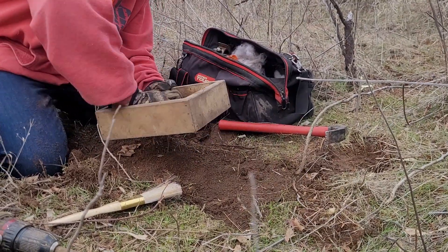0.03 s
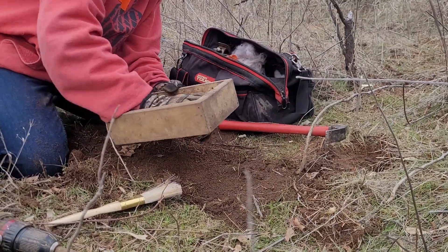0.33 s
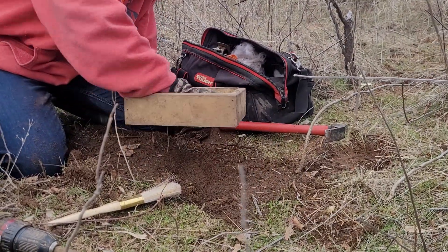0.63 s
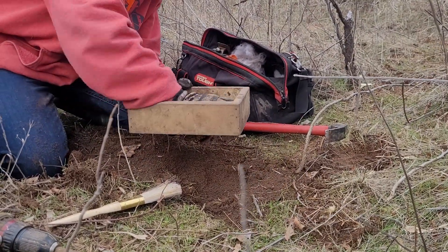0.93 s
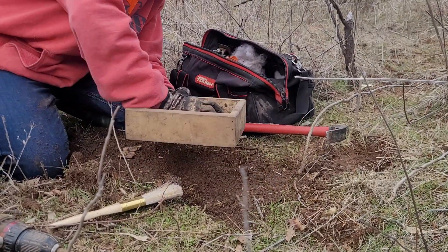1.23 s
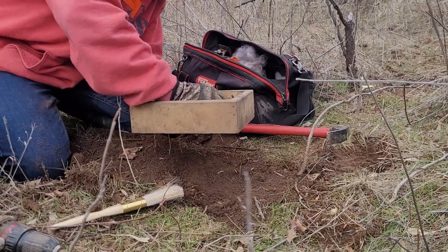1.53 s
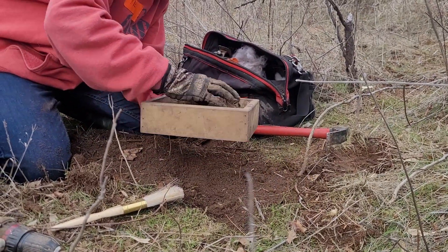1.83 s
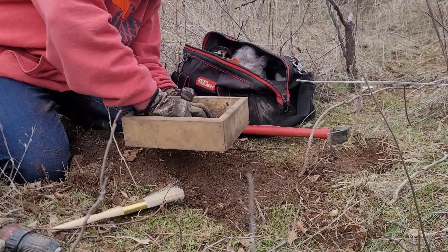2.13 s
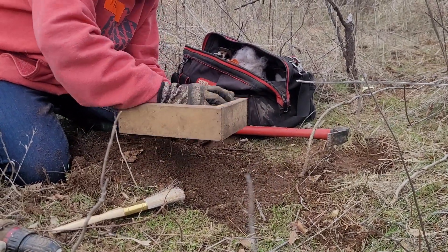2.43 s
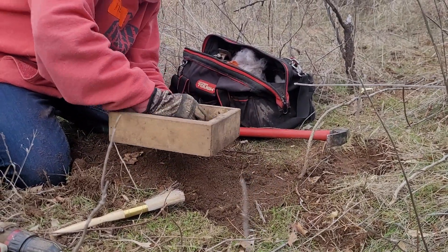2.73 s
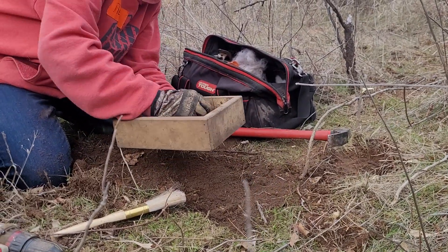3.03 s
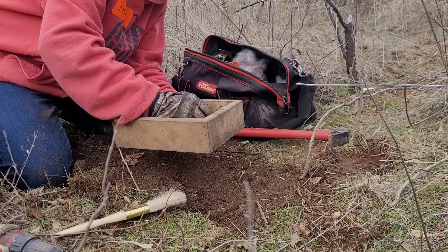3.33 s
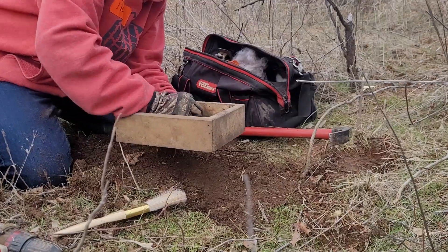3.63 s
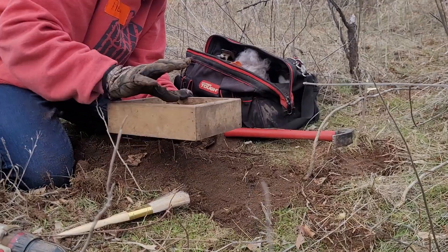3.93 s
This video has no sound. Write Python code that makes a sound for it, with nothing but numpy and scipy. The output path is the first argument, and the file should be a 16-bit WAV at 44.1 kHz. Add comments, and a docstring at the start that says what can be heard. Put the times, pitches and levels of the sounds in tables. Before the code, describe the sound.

Gritty scraping and swishing of dirt being hand-sifted in a wooden box sieve outdoors.

```python
"""First comes a gritty rubbing and a bright hiss: a gloved hand works soil through a wooden box sieve,
outdoors and a little to the left. Each stroke crushes crumbs against the mesh and lets fine soil through.
Light wind buffets the microphone over a faint low hum. Twigs snap, the frame is knocked,
grit scratches the wires and clods rattle in the box."""
import sys
import numpy as np
from scipy import signal
from scipy.fft import rfft, irfft
from scipy.io import wavfile
from scipy.ndimage import uniform_filter1d, map_coordinates

SR = 44100
rng = np.random.default_rng(int(sys.argv[2]) if len(sys.argv) > 2 else 0)


def int16_out(signal):
    """Quantize to a 16-bit WAV file."""
    q = np.round(np.clip(np.atleast_2d(signal).T, -1, 1) * 32767)
    wavfile.write(sys.argv[1], SR, q.astype(np.int16))


N = 176400
T = np.arange(N) / SR


def amp(db):
    """Turn decibels into a gain to multiply by."""
    return 10 ** (np.asarray(db) / 20)


def unit(x):
    """Scale a sound to an average (rms) level of 1."""
    return x / np.sqrt(np.mean(x ** 2) + 1e-30)


def even(response):
    """Scale a filter so that white noise keeps its power."""
    return response / np.sqrt(np.sum(response ** 2) + 1e-30)


def through(x, response):
    """Pass a sound through a filter, given as its response to one click."""
    return signal.fftconvolve(x, response)[:len(x)]


def tone(points, size=4096):
    """Make a filter's click response from (pitch [Hz], level [dB]) points."""
    hz, db = np.array(points, float).T
    log_hz = np.log(np.arange(size // 2 + 1) * SR / size + 1)
    cepstrum = irfft(np.interp(log_hz, np.log(hz), np.log(amp(db))))
    cepstrum[1:size // 2] *= 2  # fold it so that nothing sounds before the click
    cepstrum[size // 2 + 1:] = 0
    return irfft(np.exp(rfft(cepstrum)))


def lowpass(x, hz, order=2):
    """Soften everything above hz."""
    return signal.sosfilt(signal.butter(order, min(hz, SR / 3), fs=SR, output="sos"), x)


def wander(per_s):
    """A smooth random drift, about 1 in size."""
    hold = max(int(SR / per_s), 2)
    steps = np.repeat(rng.standard_normal(N)[:N // hold + 1], hold)
    return unit(uniform_filter1d(steps, hold)[:N])


def add(out, time, sound):
    """Mix a sound in at a time in seconds."""
    start = int(time * SR)
    out[start:start + len(sound)] += sound[:N - start]


def grains(per_s, spread_db):
    """Tiny impacts of uneven size at random moments."""
    hits = (rng.random(N) < per_s / SR) * np.sign(rng.standard_normal(N))
    return unit(hits * amp(spread_db * np.clip(rng.standard_normal(N), -2.5, 2.5)))


def rattle(decay, hits_per_s=2600, spread_db=0.5, size=4096):
    """A quick run of impacts that dies away."""
    hits = (rng.random(size) < hits_per_s / SR) * rng.choice([-1, 1], size)
    strength = amp(spread_db * rng.standard_normal(size))
    return even(hits * strength * np.exp(-T[:size] / decay)) * np.sqrt(decay * SR / 2)


def blow(sound, db):
    """Give a short sound the energy of 4 ms at this level."""
    return even(sound) * amp(db) * np.sqrt(.004 * SR)


def ring(notes, detune=0, size=4096):
    """A struck object's fading notes, each off its pitch by a random share."""
    t = T[:size]
    tuning = 1 + detune * rng.standard_normal(len(notes))
    return even(sum(amp(db - 60 * t / fade) * np.sin(2 * np.pi * hz * k * t)
                    for (hz, fade, db), k in zip(notes, tuning)))


# notes of the loaded box (pitch [Hz], time to fade by 60 dB [s], level [dB])
BOX_NOTES = [(280, 0.011, 6.5), (725.5, 0.039, 2.5), (990, 0.013, 6), (1585, 0.04, 5.5), (1827, 0.04, 8),
             (2480, 0.021, 12.5), (3660, 0.025, 6.5), (4246, 0.031, 0.5)]
def box_ring(detune=0.036):
    """The wooden box rings; the hand and the shifting load put it slightly out of tune each time."""
    return ring(BOX_NOTES, detune)


# tone of the box's hollow (pitch [Hz], level [dB])
HOLLOW_TONE = [(280, -6.5), (450, -7.5), (700, -2.5), (1200, -1), (1550, -0.5), (2480, -1), (4400, -1.5),
               (5850, -3.5), (7450, 3.5), (8600, -1), (10500, 1)]
def hollow(x):
    """The box colours the sound of soil moving in it."""
    return through(x, tone(HOLLOW_TONE))


def coarse_crumbs(per_s=330, low_hz=1497, high_hz=4410, decay_cycles=7.1, spread_db=3.5):
    """Big crumbs crack one by one, each a few cycles at a random pitch."""
    out = np.zeros(N)
    for when, pitch, chance in rng.random((int(per_s * N / SR), 3)):
        hz = low_hz * (high_hz / low_hz) ** pitch
        cycles = hz * T[:512]
        strength = amp(spread_db * min(-np.log(chance), 3))
        add(out, when * T[-1], strength * np.exp(-cycles / decay_cycles) * np.sin(2 * np.pi * cycles))
    return unit(out)


def glove_roll(x, band_range_hz=(1136, 5240), bands=9, swing_db=3.5):
    """As the glove rolls over the crumbs, each band of pitch swells and fades on its own."""
    spectrum = rfft(x)
    log_hz = np.log(np.arange(len(spectrum)) * SR / N + 1)
    centres = np.linspace(*np.log(band_range_hz), bands)
    parts = [irfft(spectrum * np.interp(log_hz, centres, band), N) for band in np.eye(bands)]
    return unit(sum(part * amp(swing_db * wander(per_s=36)) for part in parts))


CRUMBS_PER_S, CRUMB_SPREAD_DB, FINES_PER_S, FINE_SPREAD_DB = 4500, 3, 15000, 2.5
# tones of crushed crumbs and of fine soil (pitch [Hz], level [dB])
CRUNCH_TONE = [(120, -25), (270, 4.5), (450, -15.5), (690, -19), (900, -11.5), (1300, -6.5), (1560, 0),
               (2080, -4.5), (2400, 3.5), (2950, -1.5), (4400, 2), (5600, -12), (8000, -21), (15000, -39)]
HISS_TONE = [(1000, -9.5), (4000, -2.5), (5800, -5.5), (7500, -2), (8600, -4), (10000, 0), (12500, -1.5),
             (15500, -6.5)]
# hand strokes (peak time [s], rise [s], fall [s], crunch level [dB], hiss level [dB], rasp pitch [Hz])
HAND_STROKES = [(.03, 0.09, 0.072, -54.5, -57, 2560), (.10, 0.031, 0.035, -43.5, -53, 2430),
                (0.2, 0.047, 0.015, -50, -61, 2540), (.325, 0.14, 0.036, -54.5, -66, 2590),
                (0.426, 0.067, 0.037, -45, -52.5, 2420), (0.568, 0.044, 0.067, -45, -51.5, 2720),
                (0.717, 0.039, 0.02, -47, -52.5, 3170), (0.836, 0.065, 0.017, -53.5, -61, 2800),
                (0.853, 0.014, 0.042, -45.5, -55.5, 2280), (0.983, 0.039, 0.018, -43.5, -48, 3370),
                (1.09, 0.05, 0.027, -48, -56.5, 2850), (1.204, 0.036, 0.015, -43, -49, 3640),
                (1.26, 0.023, 0.017, -50, -56.5, 1720), (1.299, 0.018, 0.026, -43.5, -57, 2280),
                (1.396, 0.032, 0.016, -43.5, -49.5, 2570), (1.479, 0.046, 0.046, -51.5, -60, 2400),
                (1.765, 0.058, 0.042, -68, -75.5, 2530), (2.006, 0.0084, 0.02, -51, -56.5, 1860),
                (2.099, 0.024, 0.018, -51, -55.5, 1960), (2.16, 0.026, 0.055, -66, -74, 2800),
                (2.293, .035, 0.034, -49.5, -58, 2000), (2.436, 0.031, 0.0099, -57, -67.5, 2840),
                (2.565, 0.061, 0.04, -62, -62, 3700), (2.609, 0.022, 0.047, -55, -68, 2470),
                (2.749, 0.041, 0.036, -63.5, -67.5, 2270), (2.954, 0.052, 0.024, -63.5, -63, 2030),
                (3.02, 0.12, 0.026, -57, -74.5, 1730), (3.162, 0.069, 0.03, -53, -59, 2180),
                (3.281, 0.039, 0.063, -52, -58, 2080), (3.409, 0.022, 0.046, -59.5, -60.5, 4050),
                (3.466, 0.02, 0.019, -52, -63, 2340), (3.577, 0.049, 0.048, -51.5, -55, 2870),
                (3.693, 0.036, 0.05, -51.5, -55, 3700), (3.815, 0.029, 0.046, -50, -54.5, 3960),
                (3.891, 0.021, 0.032, -53.5, -57.5, 2650)]
def rubbing(rasp_db=5, rasp_octaves=0.63, box_db=-8.5):
    """Each stroke swells and fades: crumbs rasp on the mesh and ring the box, fine soil hisses through."""
    catch = wander(per_s=220)  # the glove catches and slips
    crumbs = amp(1.38 * catch) * grains(CRUMBS_PER_S, CRUMB_SPREAD_DB)
    crumbs = glove_roll(through(crumbs, even(tone(CRUNCH_TONE))) + amp(-6) * coarse_crumbs())
    fines = through(amp(2 * catch) * grains(FINES_PER_S, FINE_SPREAD_DB), even(tone(HISS_TONE)))
    taps = grains(CRUMBS_PER_S, CRUMB_SPREAD_DB)
    out = amp(-74) * crumbs + amp(-80.5) * fines  # a trickle goes on between strokes
    width = 2 ** rasp_octaves
    for peak, rise, fall, crunch_db, hiss_db, hz in HAND_STROKES:
        span = slice(max(int((peak - 3 * rise) * SR), 0), int((peak + 3 * fall) * SR))
        t = T[span] - peak
        push = np.exp(-np.abs(t / np.where(t < 0, rise, fall)) ** 2.05)  # a lopsided bell curve
        grip = tone([(hz / width, -rasp_db), (hz, 0), (hz * width, -rasp_db)], size=1024)
        rasp = unit(through(crumbs[span], grip))
        box = amp(box_db) * through(taps[span], box_ring())
        out[span] += push * (amp(crunch_db) * (rasp + box) + amp(hiss_db) * fines[span])
    return hollow(out)


# tone of pouring soil (pitch [Hz], level [dB])
POUR_TONE = [(4000, -15), (6000, -16), (8000, -13), (10500, -13), (14500, -5)]
# runs of fine soil (start [s], end [s], level [dB])
POUR_RUNS = [(0, .45, -58), (2.09, 2.104, -53.5)]
def pouring(fade_s=0.015):
    """Fine soil falls through the mesh in bright runs of tiny impacts."""
    flow = sum(amp(db) * np.clip(1 + np.minimum(T - start, end - T) / fade_s, 0, 1)
               for start, end, db in POUR_RUNS)
    return flow * through(grains(FINES_PER_S, FINE_SPREAD_DB), even(tone(POUR_TONE)))


# gusts of wind (peak time [s], half length [s], level [dB], top pitch [Hz])
WIND_GUSTS = [(0.036, 0.026, -46.5, 96), (.19, 0.11, -46.5, 81), (0.332, 0.012, -40, 118),
              (0.5, 0.15, -50.5, 85), (0.673, 0.014, -29.5, 82), (0.799, 0.046, -40, 95),
              (0.969, 0.021, -35.5, 105), (1.011, 0.011, -37, 70), (1.062, 0.015, -32, 133),
              (1.489, 0.02, -48.5, 74.4), (1.666, 0.028, -35.5, 93), (1.739, 0.031, -32, 63),
              (1.933, 0.18, -45, 76.6), (2.222, 0.054, -46.5, 79), (2.514, 0.15, -52, 77.4),
              (2.73, 0.032, -44.5, 72), (2.828, 0.015, -34, 74.6), (2.954, 0.011, -40, 106),
              (3.051, 0.079, -42.5, 71.4)]
def wind(breeze_db=-55.5, breeze_ends_s=3.2, lowest_hz=35, left_db=-19.5, shared=0.24):
    """Swirls of air rumble and thump on the microphone, mostly on the right."""
    low_cut = signal.butter(3, lowest_hz, "high", fs=SR, output="sos")
    left, right = signal.sosfilt(low_cut, rng.standard_normal((2, N)))
    noise = np.array([shared * right + np.sqrt(1 - shared ** 2) * left, right])
    fade_out = np.clip((breeze_ends_s - T) / 0.029, 0, 1)
    out = amp(breeze_db) * unit(lowpass(noise, hz=43.3, order=3)) * fade_out
    for peak, half, db, hz in WIND_GUSTS:
        swell = np.exp(-((T - peak) / half) ** 2)
        out += amp(db) * unit(lowpass(noise, hz, order=4) * swell) * np.sqrt(np.mean(swell ** 2))
    return signal.sosfilt(low_cut, out) * amp([[left_db], [0]])


# tone of still air (pitch [Hz], level [dB])
AIR_TONE = [(25, -6.5), (60, 12), (130, -3.5), (260, -8), (450, -20.5), (1000, -27.5), (4000, -33),
            (15000, -32)]
def air_and_hum(air_db=-66, hum_hz=64, hum_db=-62, hum_left_db=-9.5):
    """Quiet outdoor air and a low, slightly wavering hum."""
    noise = rng.standard_normal((2, N)) + 0.67 * rng.standard_normal(N)  # partly shared by both sides
    air = np.array([unit(through(side, tone(AIR_TONE))) for side in noise])
    pitch = hum_hz * (1 + .015 * wander(per_s=6))
    hum = unit(np.sin(2 * np.pi * np.cumsum(pitch) / SR) * amp(1.8 * wander(per_s=7)))
    return amp(air_db) * air + amp(hum_db) * hum * amp([[hum_left_db], [0]])


# tone of one snap (multiple of its strongest pitch [ratio], level [dB])
SNAP_TONE = [(.03, -26), (.12, -4.5), (.4, -6), (1, 1.5), (1.6, -2), (2.6, -19.5), (6, -26)]
# snapping twigs and small stones (time [s], level [dB], strongest pitch [Hz])
TWIG_SNAPS = [(0.1183, -31, 1900), (0.4034, -46.5, 2870), (0.484, -39, 1460), (.493, -48, 2230),
              (0.8468, -42.5, 2350), (1.0988, -41, 1930), (1.2154, -49, 1900), (2.1949, -54.5, 8900),
              (2.5396, -31.5, 2350)]
def snaps():
    """Twigs and small stones give single dry cracks that do not ring."""
    out = np.zeros(N)
    for time, db, hz in TWIG_SNAPS:
        crack = tone([(hz * multiple, level) for multiple, level in SNAP_TONE])
        add(out, time, blow(crack, db))
    return out


# knocks on the frame (time [s], level [dB], top pitch [Hz], fade time under the grip [s])
FRAME_KNOCKS = [(0.1733, -47.5, 1500, .002), (0.7255, -36, 950, 0.0061), (0.848, -48, 920, 0.034),
                (1.100, -42, 900, 0.033), (1.213, -45.5, 900, .03), (1.294, -45.5, 910, 0.033),
                (2.068, -59.5, 1000, .04), (2.155, -60, 950, .04), (2.196, -58.5, 1000, .04),
                (2.225, -60, 850, .04), (2.243, -58, 950, .04), (2.74, -60.5, 2400, .004),
                (3.758, -57.5, 1540, .003)]
def knocks(lowest_hz=534):
    """Soft blows make a hollow tock, cut short by the hand's grip; the small frame gives little bass."""
    out = np.zeros(N)
    low_cut = signal.butter(4, lowest_hz, "high", fs=SR, output="sos")
    for time, db, hz, fade in FRAME_KNOCKS:
        wood = box_ring(detune=0.018)
        tock = signal.sosfilt(low_cut, wood * np.exp(-T[:len(wood)] / fade))
        add(out, time, blow(lowpass(tock, hz, order=6), db))
    return out


# notes of the wire mesh (pitch [Hz], time to fade by 60 dB [s], level [dB])
MESH_NOTES = [(1740, 0.014, 5.5), (2586, 0.017, 9.5), (3260, 0.0038, -11), (4030, 0.0064, 3),
              (4540, 0.016, 0.5), (6880, 0.0033, -4)]
# grit on the mesh (time [s], fade time [s], level [dB], favoured pitch [Hz])
GRIT_SCRATCHES = [(0.1881, 0.002, -34, 3600), (0.2311, 0.0053, -34.5, 2420), (0.2384, .003, -36.5, 2400),
                  (0.2619, 0.0029, -37.5, 2940), (0.4009, 0.0012, -28.5, 2560),
                  (0.4536, 0.002, -35.5, 3070), (2.24, 0.0028, -44.5, 4360)]
def scratches(focus_db=6.5):
    """Grit dragged over the wires rings them in short, dry rasps."""
    out = np.zeros(N)
    for time, fade, db, hz in GRIT_SCRATCHES:
        focus = tone([(hz / 2, -focus_db), (hz, 0), (hz * 2, -focus_db)])
        wires = through(np.diff(ring(MESH_NOTES), prepend=0), focus)  # diff brightens the ring
        add(out, time, amp(db) * through(rattle(fade), even(wires)))
    return out


# clods thrown against mesh and frame (time [s], fade time [s], level [dB], strongest pitch [Hz])
CLOD_HITS = [(0.8455, 0.0027, -31, 3220), (.990, 0.0085, -40, 1490), (1.0997, 0.014, -37.5, 1730),
             (1.212, 0.0051, -36, 1290), (1.293, 0.0028, -34.5, 1970), (1.299, 0.0065, -36, 2300),
             (1.398, 0.015, -45, 1110), (2.9376, 0.0039, -39, 4460), (2.989, 0.0028, -43.5, 3970),
             (3.239, 0.003, -48.5, 2450)]
def clods(step_octaves=0.92, box_db=-9.5):
    """Lumps of soil break against the frame and ring the box."""
    out = np.zeros(N)
    step = 2 ** step_octaves
    for time, fade, db, hz in CLOD_HITS:
        colour = tone([(hz / step ** 2, -18), (hz / step, -9), (hz, 0),
                       (4600, -6), (5800, -18), (15000, -24)])
        crack = through(rattle(fade), even(colour))
        box = amp(box_db) * through(rattle(fade), box_ring())
        add(out, time, amp(db) * (crack + box))
    return hollow(out)


# tones on the right, straight from the sieve and scattered by the ground (pitch [Hz], level [dB])
DIRECT_TONE = [(200, 1.5), (700, -7.5), (1400, -16.5), (2500, -23), (4200, -35.5), (7000, -11.5),
               (8300, -26.5), (15000, -17)]
SCATTERED_TONE = [(200, -6.5), (450, -6), (700, 4), (1400, -4.5), (2500, -7), (4200, -5.5), (7000, 2.5),
                  (8200, -15), (15000, -21)]
def far_side(sieve, clatter, lead_s=.00005, scatter_s=0.0011, size=2048):
    """The shaded right side hears the sieve duller and a hair earlier, plus scattered soil noise."""
    ground = even(rng.standard_normal(size) * np.exp(-T[:size] / scatter_s))
    scattered = amp(-5) * rubbing()  # the same strokes with fresh random grains
    scattered += amp(-8.5) * through(clatter, ground)
    shaded = through(sieve, tone(DIRECT_TONE))
    direct = map_coordinates(shaded, [(T + lead_s) * SR], mode="nearest")
    return direct + through(scattered, tone(SCATTERED_TONE))


def scene():
    """The sieve is clear on the left and shaded on the right, with wind, air and hum around it."""
    clatter = clods() + scratches()
    sieve = rubbing() + pouring() + clatter + knocks() + snaps()
    return np.array([sieve, far_side(sieve, clatter)]) + wind() + air_and_hum()


def record(dry, top_hz=15850):
    """Cut off the very highest treble."""
    return signal.sosfilt(signal.ellip(10, .1, 70, top_hz, fs=SR, output="sos"), dry)


dry = scene()
out = record(dry)
int16_out(out)
```